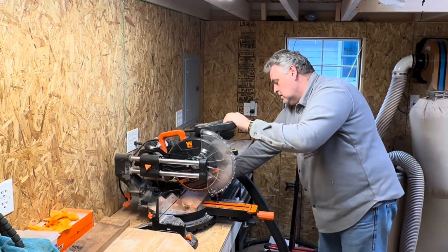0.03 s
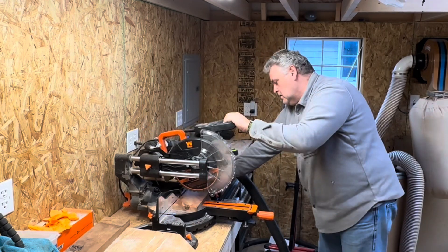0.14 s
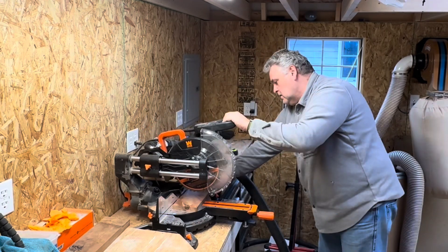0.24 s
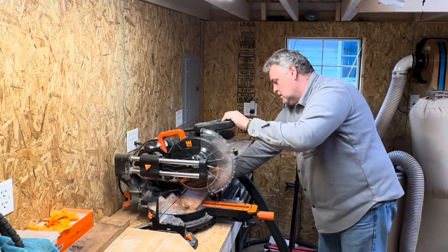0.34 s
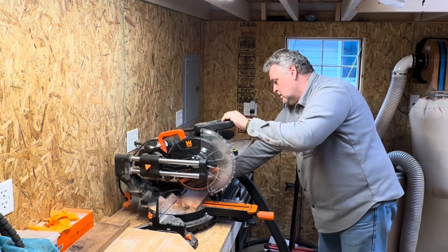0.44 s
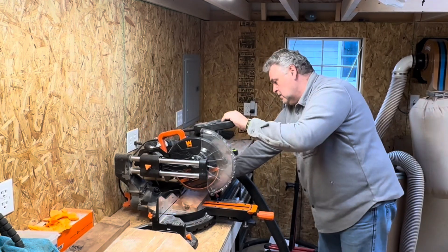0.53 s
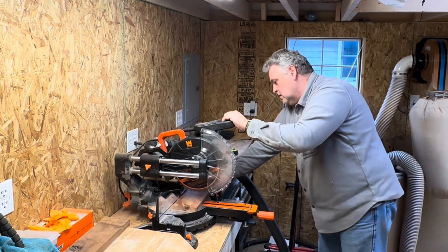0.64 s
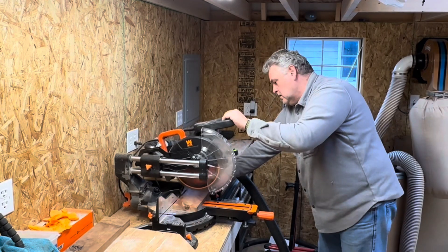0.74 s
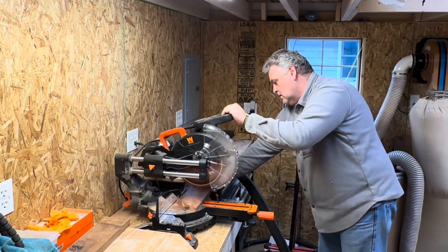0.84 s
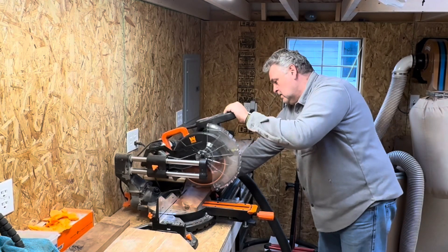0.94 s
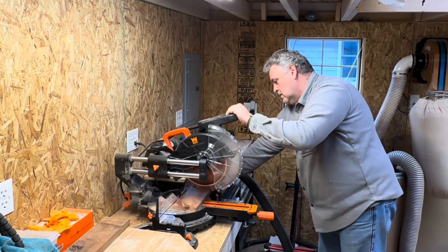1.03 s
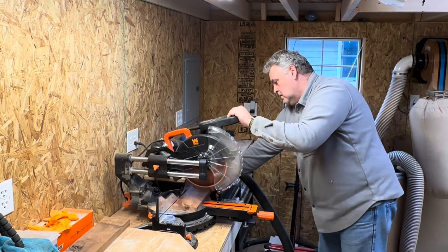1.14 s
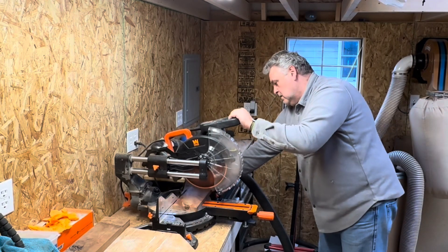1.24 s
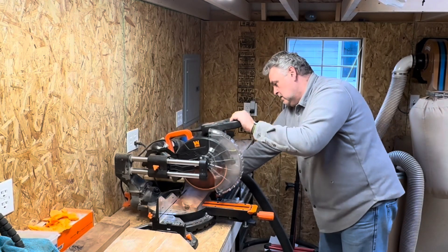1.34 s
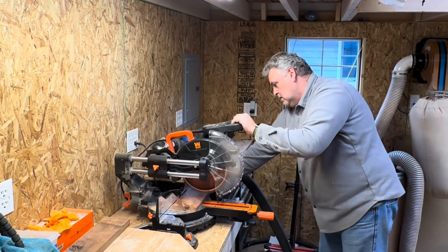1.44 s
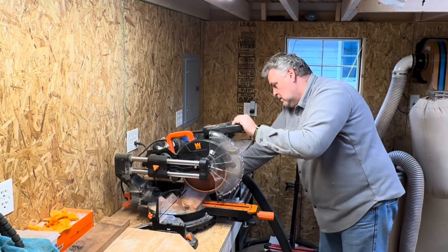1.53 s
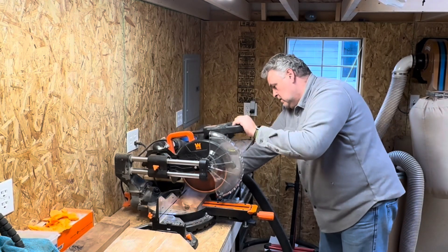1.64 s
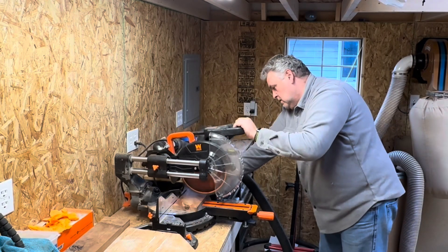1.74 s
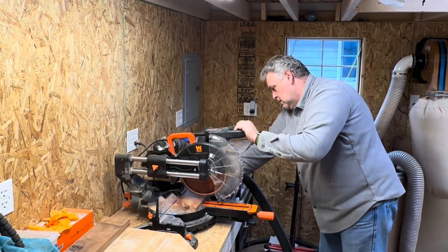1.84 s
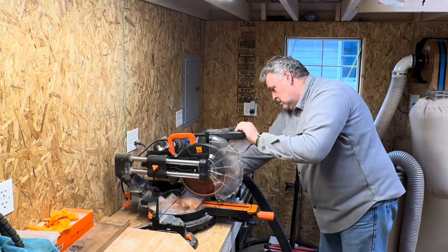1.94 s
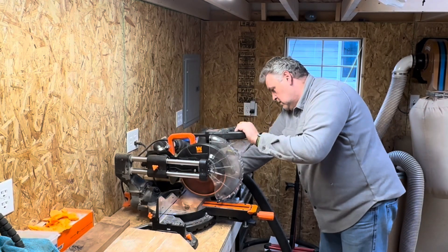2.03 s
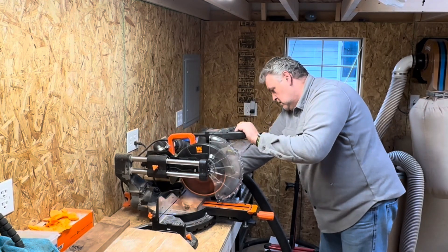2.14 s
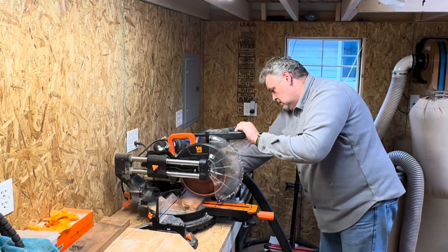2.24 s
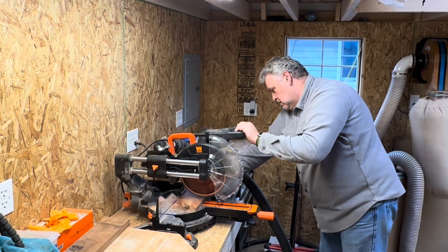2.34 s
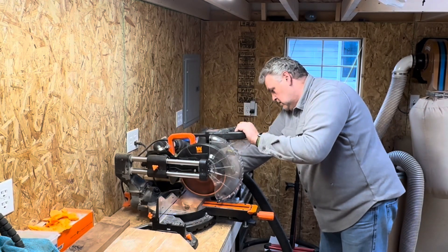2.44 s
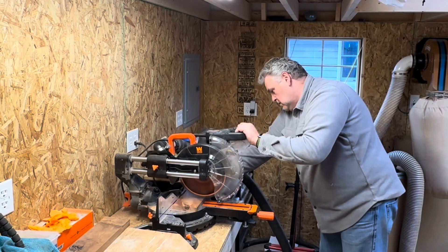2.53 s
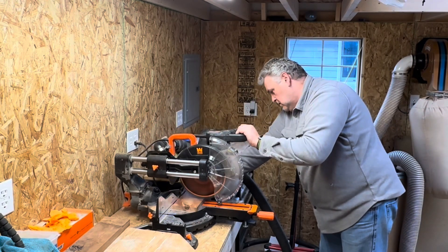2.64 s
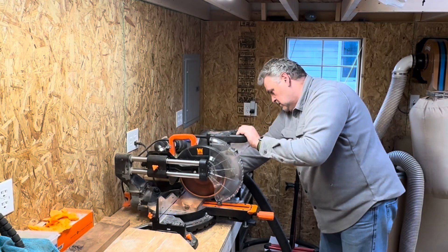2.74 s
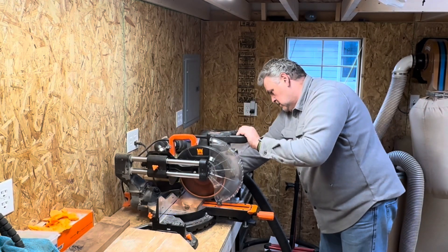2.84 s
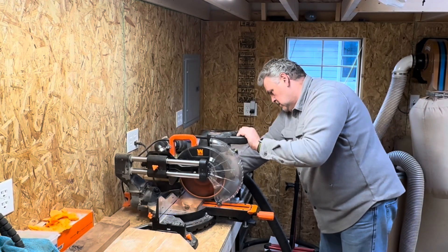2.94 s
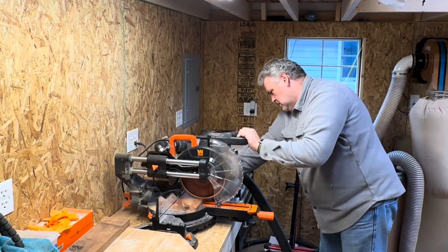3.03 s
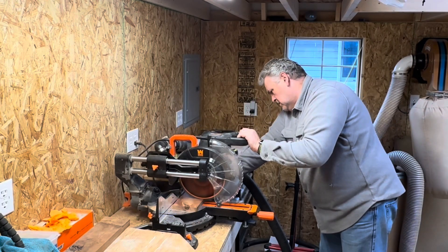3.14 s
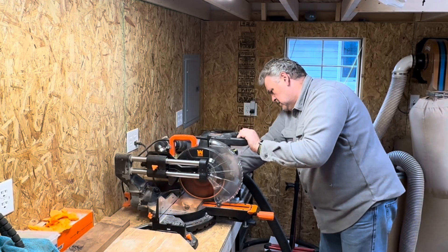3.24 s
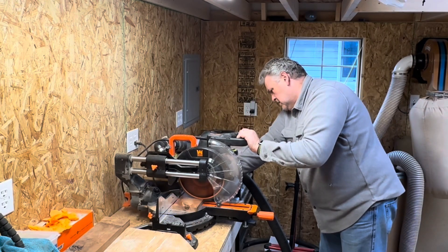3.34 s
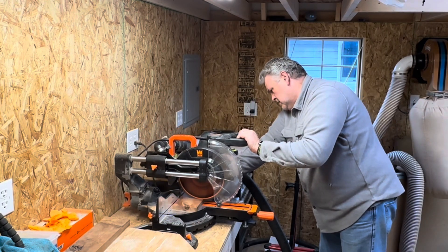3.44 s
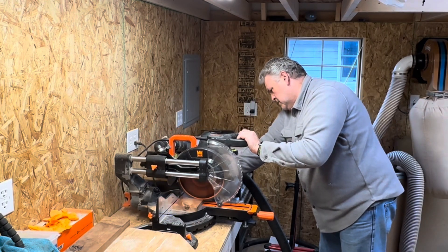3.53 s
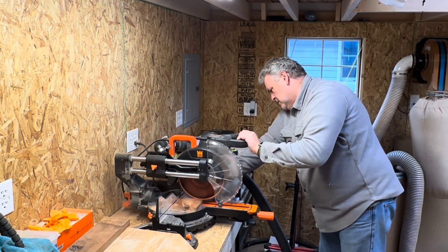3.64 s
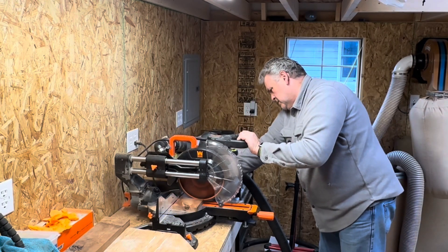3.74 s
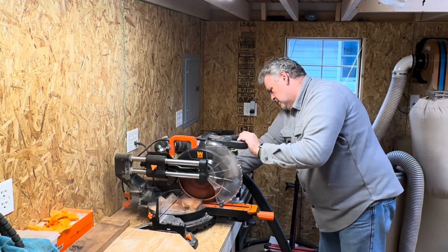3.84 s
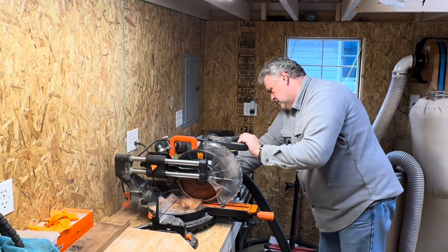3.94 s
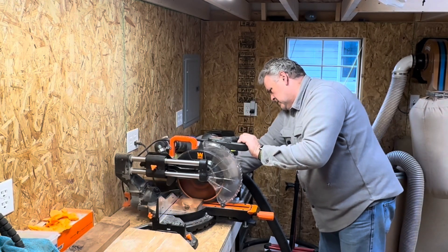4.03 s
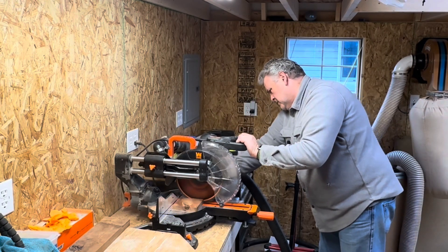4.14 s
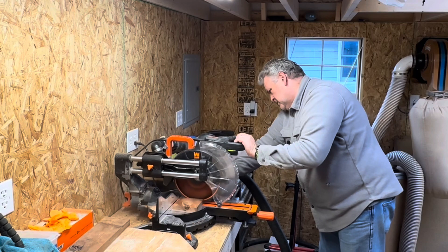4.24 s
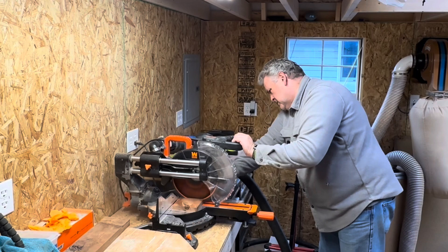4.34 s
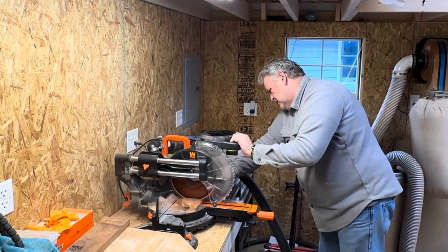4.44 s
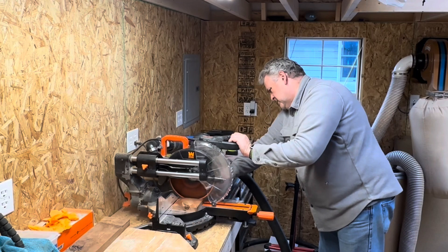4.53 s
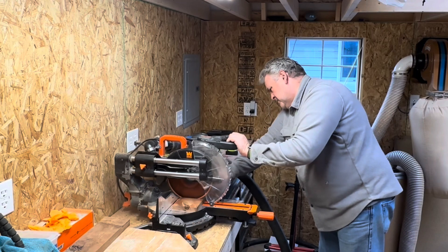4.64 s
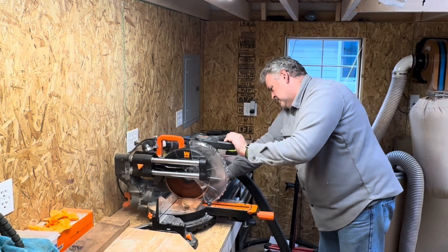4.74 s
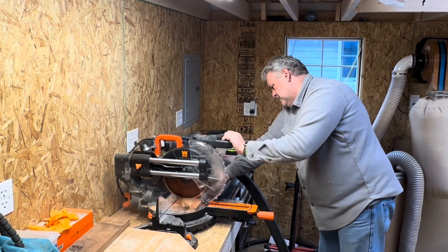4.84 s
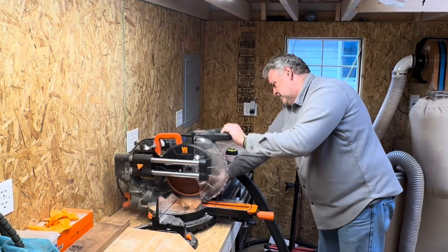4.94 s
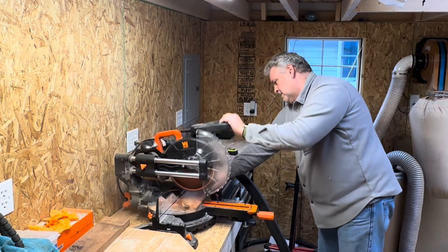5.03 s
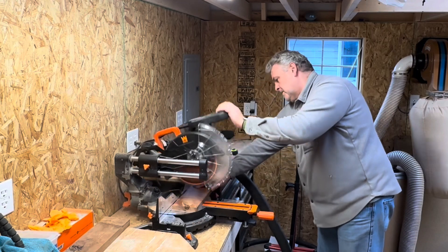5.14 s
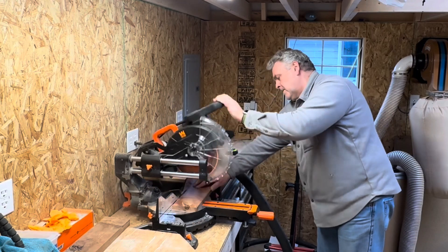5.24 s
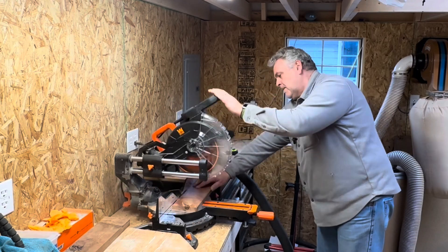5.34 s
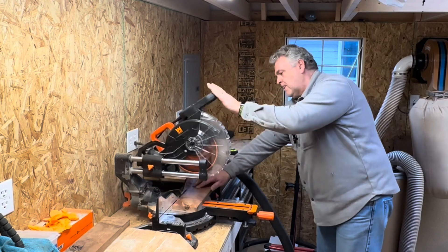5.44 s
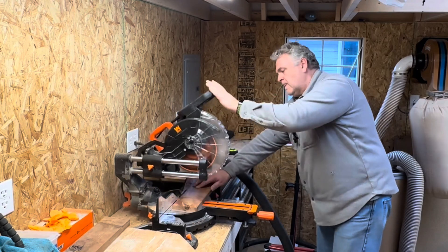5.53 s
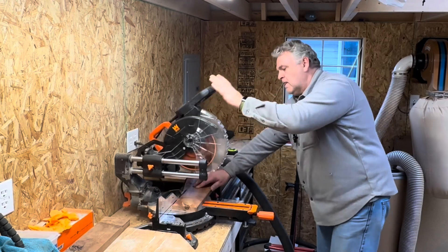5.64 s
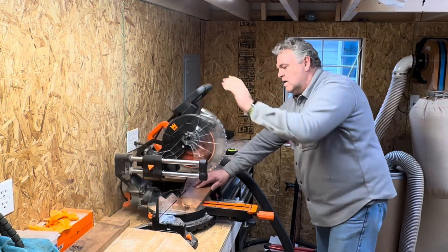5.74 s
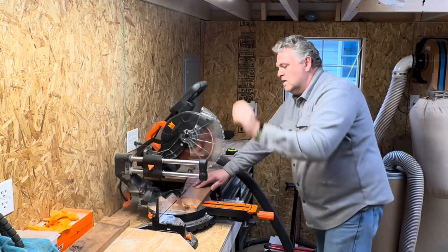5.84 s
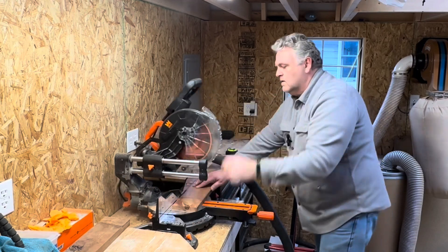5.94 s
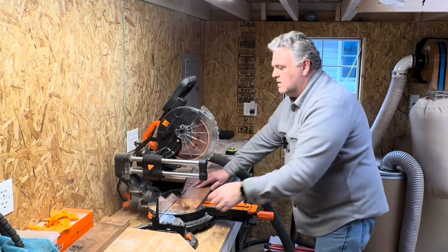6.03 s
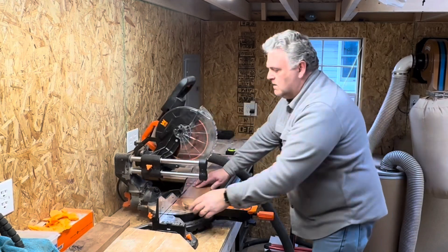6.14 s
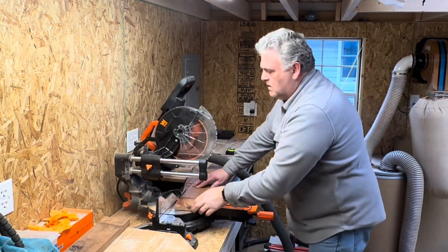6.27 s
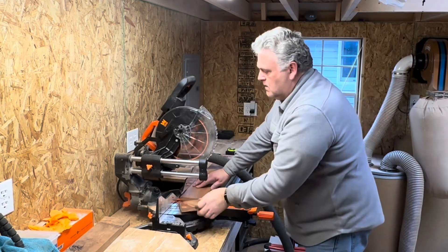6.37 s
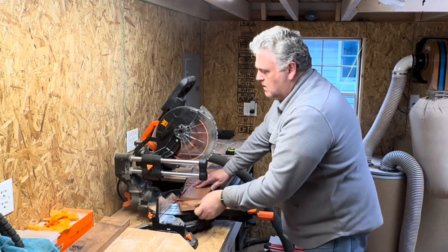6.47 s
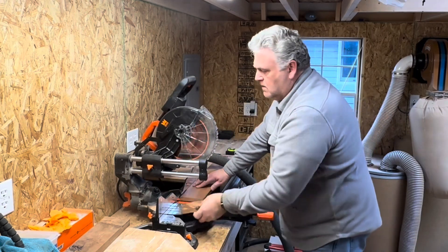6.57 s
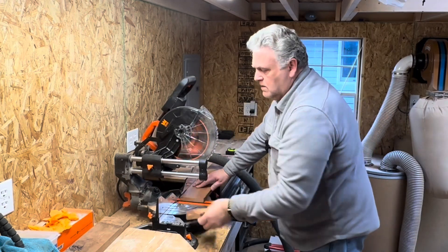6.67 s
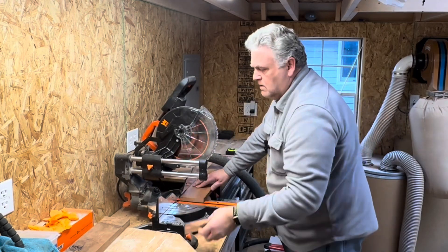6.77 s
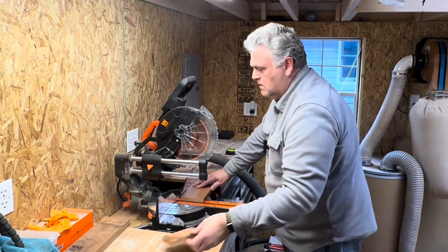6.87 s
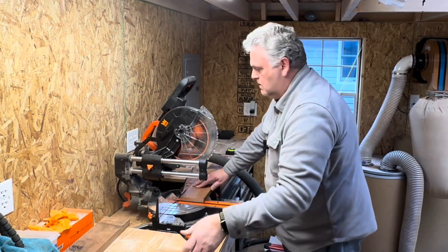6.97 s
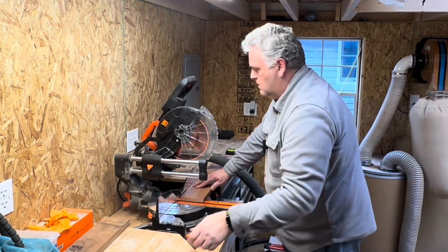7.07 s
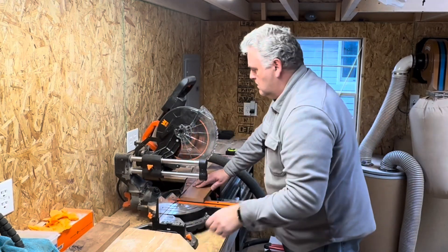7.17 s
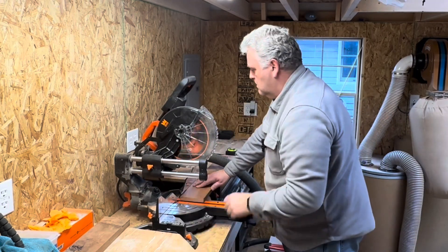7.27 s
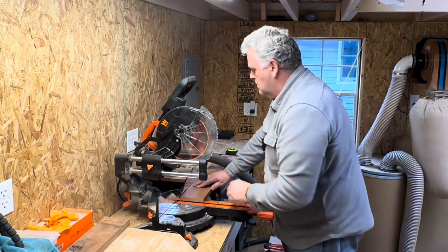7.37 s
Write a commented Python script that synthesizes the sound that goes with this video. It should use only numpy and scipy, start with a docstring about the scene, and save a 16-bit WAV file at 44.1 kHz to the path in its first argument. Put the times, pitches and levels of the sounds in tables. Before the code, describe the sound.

Quiet air and faint rustling open the scene. A power saw kicks in with a jolt, whines upward and cuts wood in a dense, bright, nearly overloading roar. After the cut it spins more softly and hissily, then winds down quickly in a descending whine with a little flutter. A steady mid-low hum from a dust collector remains in the small, short-echo room before wood clatters sharply on the bench. Close single microphone, same in both channels.

```python
"""A small wooden workshop, heard by one microphone: a dust collector hums in the background, with faint swells.
A miter saw starts with a jolt, runs up, cuts a board and brakes to a stop; its noise is a roar that rings in
the housing, and gear, rotor slots and commutator whine as sines on multiples of the rotor speed.
The collector's hum comes forward as the saw dies away, and at the end a piece of wood is dropped on the bench,
a cluster of noise bursts shaped by the resonances of the wood."""
import sys
import numpy as np
from scipy import signal
from scipy.fft import rfft, irfft
from scipy.io import wavfile
from scipy.ndimage import uniform_filter1d

SR = 44100
rng = np.random.default_rng(int(sys.argv[2]) if len(sys.argv) > 2 else 0)


def pcm_store(signal):
    """Save signal as 16-bit PCM."""
    levels = np.round(np.clip(np.atleast_2d(signal), -1, 1) * 32767)
    wavfile.write(sys.argv[1], SR, levels.astype(np.int16).T)


N = 326428
S = np.arange(N) / SR  # time of each sample, s
HZ = np.fft.rfftfreq(1024, 1 / SR)  # bins of the short-time spectra
FRAME_S = np.arange(N // 256 + 5) * 256 / SR  # times of their frames, s
BLADE = 7 / 37  # blade turns for each rotor turn
# The rotor from start to stop. Each row: time in seconds, speed in turns per second, whine level in dB.
ROTOR = [(.76, 114.6, -8), (.806, 158.8, -16), (.86, 206.2, -4), (0.949, 248, -11), (1.07, 286.3, -9.5),
         (1.2, 313, -6), (1.37, 329.8, -4), (1.63, 352, -8), (1.9, 363, -11), (2.299, 379.3, -10.5),
         (2.601, 387, -20.5), (2.9, 376.2, -22.5), (3.199, 365.3, -30), (3.42, 365, -26),
         (3.62, 368, -38.5), (4.92, 359, -51), (4.999, 330.7, -30), (5.051, 300.7, -29), (5.11, 269, -17.5),
         (5.18, 233.3, -20.5), (5.281, 195.7, -22.5), (5.4, 155, -42), (5.501, 129, -20.5),
         (5.601, 106.8, -48), (5.8, 77.5, -49), (5.96, 62.4, -39), (6.03, 59.7, -70)]


def amp(db):
    """Amplitude for a level in dB."""
    return 10 ** (np.asarray(db) / 20)


def evened(x):
    """Scales a whole array to rms 1."""
    return x / np.sqrt(np.mean(x ** 2) + 1e-20)


def read(points, hz):
    """Reads a curve of (Hz, value) points, straight over log frequency."""
    f, value = np.transpose(points)
    return np.interp(np.log(hz + 1), np.log(f + 1), value)


def unit(gain):
    """Scales a spectrum so that noise shaped by it has rms 1."""
    return gain / np.sqrt((gain ** 2).sum(0))


def peak(hz, width):
    """Gain of a resonance over frequency; it is halved at the edges of the width."""
    return 1 / (1 + (2 * (HZ[:, None] - hz) / width) ** 2)


def drift(count, frames):
    """Rows of slow chance, together rms 1."""
    x = rng.standard_normal((len(FRAME_S), count)).T
    x = uniform_filter1d(x, frames, 1)
    return evened(uniform_filter1d(x, frames, 1))


def noise(gain, patchy_db):
    """Random short-time spectra with drifting patches, shaped by gain (bins x frames)."""
    real, imaginary = rng.standard_normal((len(FRAME_S), len(HZ), 2)).T
    patches = evened(uniform_filter1d(drift(count=len(HZ), frames=8), size=8, axis=0))
    z = (real + 1j * imaginary) * amp(patchy_db * patches)
    loudness = signal.istft(z / np.sqrt(len(HZ)), nperseg=1024, noverlap=768)[1].std()
    return signal.istft(z * gain, nperseg=1024, noverlap=768)[1][:N] / loudness


def collector():
    """Impeller tone with a low rush that grows with it, broad air and a hiss that rings in the hose."""
    # Dust collector. Each row: time in seconds, hum in dB, air in dB, hose hiss in dB, hose resonance in Hz.
    course = [(0, -50, -45, -56, 3220), (.14, -53, -43.5, -52, 3250), (.3, -52, -45.5, -47, 3000),
              (.38, -49, -45, -55, 3200), (.55, -56, -43.5, -56.5, 3280), (5.5, -56, -40.5, -60, 3050),
              (5.7, -39, -42, -51, 3095), (5.95, -29.5, -41, -47, 3238), (6.6, -27, -41, -48, 3220),
              (7.0, -28, -43, -46.5, 3160), (7.22, -31, -42, -44, 2930), (7.4, -36.5, -42.5, -41, 2900)]
    # Colour of the broad air. Each row: frequency in Hz, relative density in dB per Hz.
    air_colour = [(15, -52.5), (25, -40), (144, -16), (297, 2), (349, -36), (400, 1.5), (722, 5.5),
                  (1050, 1), (2010, -12), (2490, -16), (3170, -30), (3830, -13), (6050, -17.5),
                  (9560, -28.5), (15500, -20)]
    hum_hz, waver_db, waver_rad = 356.4, 1, 0.22
    multiples_db = (0, -28, -23)  # first to third multiple, relative to the hum
    mains_hz, mains_db = 58.6, -73  # buzz of the wiring, one sine

    s, hum_db, air_db, hose_db, hose_hz = np.transpose(course)
    level, phase = (np.interp(S, FRAME_S, row) for row in drift(count=2, frames=6))
    turn = 2 * np.pi * hum_hz * S + waver_rad * phase
    tones = sum(amp(db) * np.sin(k * turn) for k, db in enumerate(multiples_db, start=1))
    hum = np.sqrt(2) * amp(np.interp(S, s, hum_db) + waver_db * level) * tones

    rush = unit(peak(345.0, 79.0)) * amp(np.interp(FRAME_S, s, hum_db) - 15)
    air = unit(amp(read(air_colour, HZ)))[:, None] * amp(np.interp(FRAME_S, s, air_db))
    hose = unit(peak(np.interp(FRAME_S, s, hose_hz), 750.0) ** 2) * amp(np.interp(FRAME_S, s, hose_db))
    steady = noise(rush + air + hose, patchy_db=1.2)
    mains = np.sqrt(2) * amp(mains_db) * np.sin(2 * np.pi * mains_hz * S)
    return hum + steady + mains


def swells(moments):
    """Noise in one narrow or broad band that swells and dies around the middle of each moment."""
    gain = 0
    for middle, length, hz, width, db in moments:
        arch = np.cos(np.pi * np.clip((FRAME_S - middle) / length, -.5, .5)) ** 2
        gain = gain + unit(peak(hz, width)) * amp(db) * arch
    return noise(gain, patchy_db=3.0)


def rustles():
    """Faint swells of noise before the saw starts, and one airy treble swell as it runs out."""
    # Each row: middle in seconds, length in seconds, frequency in Hz, width in Hz, level at the top in dB.
    faint = [(.25, 1.0, 4170, 300, -56), (.22, .2, 1550, 160, -53), (.25, 1.0, 4950, 400, -58.5),
             (.30, 0.39, 6400, 1300, -59.5), (.47, 0.13, 520, 100, -40), (6.08, .29, 13500, 2500, -49)]
    return swells(faint)


def rotor():
    """Speed and count of turns; the speed changes by equal ratios between the rows."""
    s, speed, _ = np.transpose(ROTOR)
    speed = np.exp(np.interp(S, s, np.log(speed)))
    return speed, np.cumsum(speed) / SR


def roar():
    """Fan air, brushes and teeth in the wood, coloured by housing resonances that swell and fade."""
    # The saw's noise. Each row: time in seconds, then rumble, roar and hiss in dB.
    course = [(.67, -50, -68, -63), (.69, -35.5, -35, -40), (.78, -30, -22, -27), (.88, -25, -13.5, -20),
              (1.04, -22.5, -10.5, -15.5), (1.24, -24, -10.5, -12.5), (1.55, -20, -10, -12),
              (1.74, -23, -9, -11.5), (2.06, -27.5, -9.5, -11), (2.17, -30, -13, -13),
              (2.36, -37.5, -17.5, -12), (2.63, -40.5, -24.5, -18.5), (2.69, -39, -30, -23.5),
              (3.12, -40.5, -30, -29.5), (4.03, -42.5, -30, -30.5), (4.55, -44, -29.5, -30),
              (4.88, -43.5, -31.5, -26.5), (4.96, -41, -30.5, -34), (5.08, -37, -31.5, -34.5),
              (5.25, -38.5, -32.5, -41.5), (5.5, -51, -37.5, -48), (5.78, -58, -47.5, -55),
              (5.92, -58, -49.5, -51), (6.13, -55, -42.5, -48), (6.2, -47, -41, -64), (6.35, -52, -39, -69)]
    # Colour of that noise. Each row: frequency in Hz, relative density in dB per Hz.
    saw_colour = [(15, -59), (25, -32), (101, -30), (282, -37.5), (445, -12), (552, -12.5), (849, -8.5),
                  (1020, -6.5), (2180, 7.5), (3260, 3), (4500, 9.5), (5580, 2.5), (10100, -6),
                  (13600, -4.5), (15500, -4.5)]
    # Guard, blade and casing. Each row: frequency in Hz, relative width in Hz, relative gain in dB.
    resonances = [(449, 21, 7.5), (845, 29, 1), (1946, 39, -11.5), (2474, 19, -6), (2870, 23, -18),
                  (4370, 30, -27.5), (5130, 21, -4), (5300, 12, -26), (5930, 93, 0), (6350, 34, 6),
                  (6774, 68, 4.5), (8160, 990, 1.5), (11700, 47, -14), (13400, 270, -8)]
    # Swells of narrow or broad noise in the saw's sound: a click at the switch, low thuds, ringing and whine.
    # Each row: middle in seconds, length in seconds, frequency in Hz, width in Hz, level at the top in dB.
    saw_swells = [(.68, 0.034, 14800, 2520, -25), (.80, 0.08, 2140, 250, -13.5), (.80, .22, 123, 30, -39.5),
                  (.82, 0.14, 330, 70, -38.5), (.89, 0.25, 4280, 450, -16), (2.8, 1.51, 2610, 70, -33.5),
                  (2.86, 0.21, 4300, 120, -28), (3.38, 0.2, 4310, 120, -34), (4.5, 0.69, 4298, 50, -41),
                  (2.84, 0.14, 5280, 180.6, -28.5), (2.86, 0.14, 7430, 300, -30),
                  (3.72, .22, 6730, 446.7, -33), (4.02, .14, 5470, 1193, -28), (5.6, 0.29, 5780, 79.5, -47),
                  (5.6, 0.32, 6800, 201.4, -47), (4.06, 0.29, 484.5, 109.6, -34),
                  (4.07, .16, 6950, 395, -33), (4.25, .25, 2480, 121, -34), (4.40, 0.24, 8450, 260, -34.5),
                  (4.87, 0.16, 6550, 599, -25.5), (5.42, 0.51, 4400, 120, -45),
                  (5.71, 0.47, 4450, 894, -42), (5.16, .24, 3300, 500, -23.5),
                  (5.14, 0.19, 520, 119.9, -39)]
    width_factor, rings_db, rings_swell_db = 1.35, 4.5, 2.5
    thrum_swell_db, rumble_swell_db = -1.5, 2

    s, *courses_db = np.transpose(course)
    rumble_db, roar_db, hiss_db = (np.interp(FRAME_S, s, db) for db in courses_db)
    low, mid = drift(count=2, frames=9)
    # the thrum follows rumble and hiss by a share of their dB
    thrum_db = -26.5 + 0.42 * rumble_db + 0.33 * hiss_db + thrum_swell_db * low
    levels = thrum_db, rumble_db + rumble_swell_db * mid, roar_db, hiss_db

    swell = rings_swell_db * drift(count=len(resonances), frames=14)
    rings = sum(amp(db + row) * peak(hz, width_factor * width)
                for (hz, width, db), row in zip(resonances, swell))
    colour = amp(read(saw_colour, HZ))[:, None] * (1 + amp(rings_db) * rings)

    # four bands that add up to the whole: thrum, rumble, body, hiss
    below = [1 / (1 + (HZ / edge) ** 8) for edge in (260, 1200, 9000)]
    bands = np.diff([0 * HZ, *below, 1 + 0 * HZ], axis=0)
    thrum, rumble, body, hiss = (unit(colour * band[:, None]) * amp(db) for band, db in zip(bands, levels))

    speed, turns = rotor()
    throb = 1 + 0.024 * np.sin(2 * np.pi * BLADE * turns)  # once a blade turn
    # single rotor turns stand out as it slows
    depth = np.clip(65. / speed, 0, 1) * np.clip((6.1 - S) / .15, 0, 1)
    flutter = 1 + depth * np.sin(2 * np.pi * turns)
    fluttering = (noise(body, patchy_db=2.0) + swells(saw_swells)) * flutter
    steady = noise(thrum + rumble + hiss, patchy_db=1.5)
    fade = np.clip(np.minimum((S - .672) / 0.026, (6.4 - S) / 0.46), 0, 1)
    return (fluttering + steady) * throb * fade


def jolts():
    """The drive jolts as the motor bites; every jolt rings the same modes, each with a phase of its own."""
    # Each row: start in seconds, peak in dB ahead of the room.
    starts = [(0.695, -8.5), (0.711, -2), (0.736, -9), (0.761, -11)]
    # Modes of the drive. Each row: frequency in Hz, relative level in dB, time to fall by 60 dB in seconds.
    modes = [(700, -9, .06), (775, 0, .09), (850, -11, .05), (1480, -28, .02), (2200, -22, .015)]

    out, t = np.zeros(N), np.arange(SR // 3) / SR
    hz, db, t60 = np.transpose(modes)[:, :, None]
    phases = rng.random((len(starts), len(modes), 1))
    for (s, peak_db), phase in zip(starts, phases):
        ring = (amp(db - 60 * t / t60) * np.sin(2 * np.pi * (hz * t + phase))).sum(0)
        ring = ring * (1 - np.exp(-t / 0.0013))  # soft onset
        out[round(s * SR):][:len(t)] += amp(peak_db) * ring / abs(ring).max()
    return out


def whine(waver, flutter_db, wobble, sway, rough):
    """Sines on multiples of the rotor speed, loud where they cross a resonance.

    They tremble, wobble with blade and rotor (waver, wobble, sway in rad), and carry a rough skirt."""
    # Multiples of the rotor speed that whine; the gear has seven teeth, the rotor twelve slots.
    multiples = (2, 3, 6, 7, 12, 13, 14, 19, 20, 21, 24, 28, 56)
    # One row per multiple: relative level in dB in run-up, cut, braking, slowing and coasting.
    strength = [(-38, -12.5, -13.5, -25, -30), (-29, -11.5, -40, -40, -38), (-15, -36, -42, -40, -40),
                (-4.5, -10.5, -14.5, -20, -24), (-11, 1, -4.5, -28, -20), (-42, -39.5, -9, -28, -18),
                (-9.5, -16, 3.5, -1, -12), (-18, -35.5, 0, -11, -18), (-39, -40, -9, -28, -20),
                (-11.5, -40, -11, -30, -20), (-16.5, -34.5, -40, -43, -23), (-37.5, -40, -30, -16, 1),
                (-41, -43, -34, -35, -2)]
    # Changes to the next of these stages. Each row: start in seconds, length in seconds.
    changes = [(2.103, 0.17), (5.06, .11), (5.3, 0.12), (5.58, 0.072)]
    # Frame and guard, lit up by a passing whine. Each row: frequency in Hz, width in Hz, relative gain in dB.
    frame = [(510, 290, 2), (1098, 100, -11), (1375, 110, -7.5), (1726, 440, -1), (2133, 354, -1.5),
             (2600, 180, -16), (3190, 710, -4.5), (3800, 400, -9), (4218, 540, -1.5), (4636, 250, -5.5),
             (5600, 500, 2), (8260, 1300, 0)]
    between_db = -44.5  # gain that is left between the resonances
    rough_speed_hz = 260  # below this speed the whine grows cleaner and wobbles less

    s, _, level_db = np.transpose(ROTOR)
    at = slice(round(s[0] * SR), round(s[-1] * SR))
    all_speed, all_turns = rotor()
    t, speed, turns = S[at], all_speed[at], all_turns[at]
    out = np.zeros(N)
    fade = np.clip(np.minimum(t - s[0], s[-1] - t) / 0.0027, 0, 1)

    # levels are computed on every 32nd sample
    slow, slow_speed = S[::32], all_speed[::32]
    stage = sum(np.clip((slow - start) / length, 0, 1) for start, length in changes)
    course_db = np.interp(slow, s, level_db)
    shake = [np.interp(slow, FRAME_S, row) for row in drift(count=2 * len(multiples), frames=1)]
    grit = rng.standard_normal((len(slow), len(multiples))).T
    grit = uniform_filter1d(grit, size=3, axis=1)
    grit = evened(uniform_filter1d(grit, size=4, axis=1))
    grit_depth = rough * np.minimum(slow_speed / rough_speed_hz, 1) ** 2

    runout = wobble * np.sin(2 * np.pi * BLADE * turns) + sway * np.sin(2 * np.pi * turns)
    runout = runout * np.minimum(speed / rough_speed_hz, 1)
    for k, db, level, phase, rasp in zip(multiples, strength, shake[::2], shake[1::2], grit):
        path = amp(between_db) + sum(amp(top_db) / (1 + (2 * (k * slow_speed - hz) / width) ** 2) ** 2
                                     for hz, width, top_db in frame)
        tone_db = course_db + np.interp(stage, range(len(db)), db) + flutter_db * level
        gain = path * amp(tone_db) * (1 + grit_depth * rasp)
        trembling = waver * np.interp(t, slow, phase)
        tone = np.sin(2 * np.pi * k * turns + trembling + min(k / 7, 1) * runout)
        out[at] += fade * np.sqrt(2) * np.interp(t, slow, gain) * tone
    return out


def knocks():
    """Wood lands on the bench: dense bursts in the resonances of board and bench; the treble dies first."""
    # Each row: start in seconds, relative level in dB, brightness in dB per octave,
    # time for the lows to fall by 60 dB in seconds.
    contacts = [(7.009, -10, 7.5, 0.17), (7.021, 0.5, -1.5, 0.09), (7.031, -3.5, 4.5, 0.092),
                (7.042, -8, -4, 0.1), (7.061, -17, -4, 0.069), (7.087, -15, -3, 0.11),
                (7.128, -8, -4, 0.043), (7.137, -6, -5, 0.05), (7.147, -17.5, -6, 0.067),
                (7.159, -19, -2, 0.12)]
    # Board and bench. Each row: frequency in Hz, width in Hz, relative gain in dB.
    wood = [(90, 102, -43), (445, 80, 3), (672.5, 116, -21), (833, 96, 1.5), (1017, 64, 6.5),
            (1227, 130, 4.5), (1460, 220, -6), (1640, 123, -10), (1830, 160, -8), (2830, 360, -17),
            (3400, 510, -19.5), (4700, 390, -25.5), (6160, 1500, -39.5), (9000, 2100, -54)]

    out, t = np.zeros(N), np.arange(8192) / SR
    hz = np.fft.rfftfreq(len(t), 1 / SR) + 1
    body = sum(amp(db) / (1 + (2 * (hz - f) / width) ** 2) for f, width, db in wood)
    high = 1 / (1 + (2200 / hz) ** 6)  # share of the treble
    bursts = rng.standard_normal((len(contacts), len(t)))
    for (s, level_db, tilt_db, t60), burst in zip(contacts, bursts):
        z = rfft(burst) * body * amp(tilt_db * np.log2(np.maximum(hz, 400) / 1000))
        lows = irfft(z * (1 - high)) * amp(-60 * t / t60)
        highs = irfft(z * high) * amp(-60 * t / (0.75 * t60))
        knock = (lows + highs) / irfft(z).std() * (1 - np.exp(-t / 0.001))
        out[round(s * SR):][:len(t)] += amp(level_db - 5) * knock
    return out


def room(x, t60, wet_db):
    """Direct sound plus a short tail of sparse random echoes off the workshop."""
    at = np.arange(150, SR // 3, 20)
    tail = np.zeros(SR // 3 + 20)
    echoes = at + rng.integers(0, 20, len(at))
    tail[echoes] = rng.choice([-1., 1.], len(at)) * amp(-60 * at / SR / t60)
    return x + amp(wet_db) * signal.oaconvolve(x, tail / np.linalg.norm(tail))[:N]


def scene():
    """Whine, jolts and knocks stand in the room; all layers reach both channels alike."""
    tones = whine(waver=.33, flutter_db=2.5, wobble=.55, sway=.2, rough=.45)
    near = room(tones, t60=0.13, wet_db=-3) + room(jolts() + knocks(), t60=0.18, wet_db=-6.0)
    mono = near + roar() + rustles() + collector()
    return np.array([mono, mono])


def record(dry):
    """The loudest peaks are rounded off at full scale; then the band limit."""
    edge_hz = 15700
    rounded = dry / (1 + abs(dry) ** 5) ** (1 / 5)
    lowpass = signal.firwin(511, edge_hz, window=("kaiser", 9), fs=SR)
    return signal.oaconvolve(rounded, lowpass[None], "same")


dry = scene()
out = record(dry)
pcm_store(out)
```